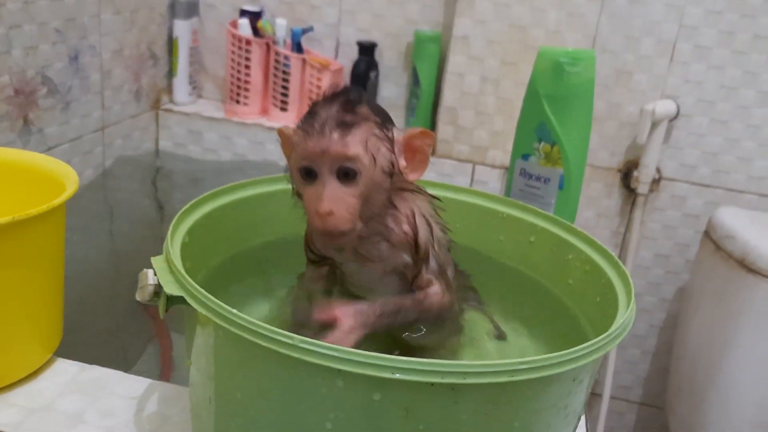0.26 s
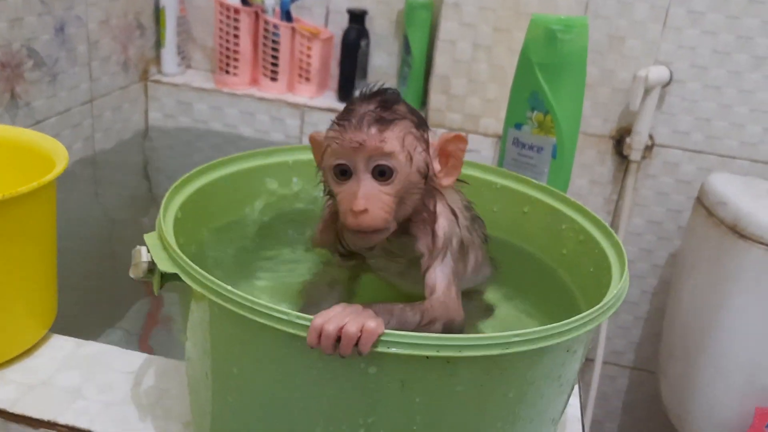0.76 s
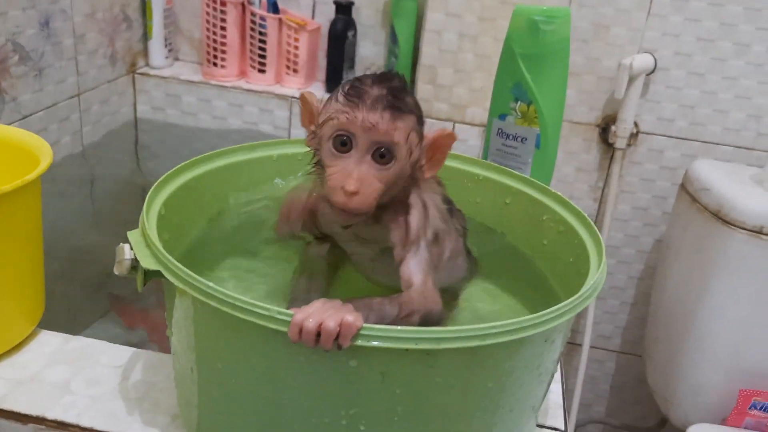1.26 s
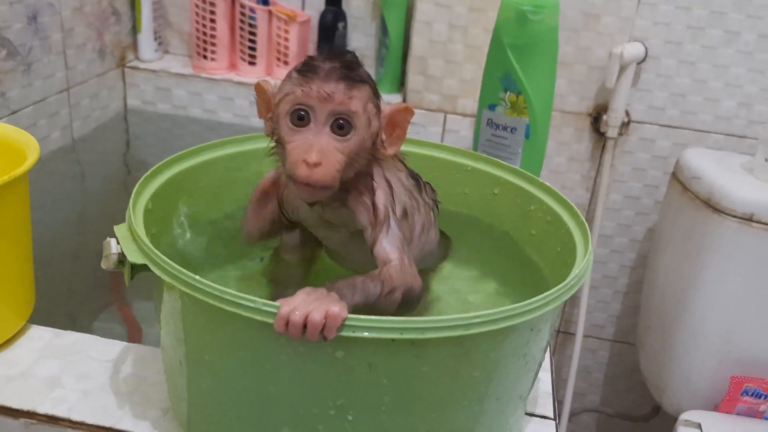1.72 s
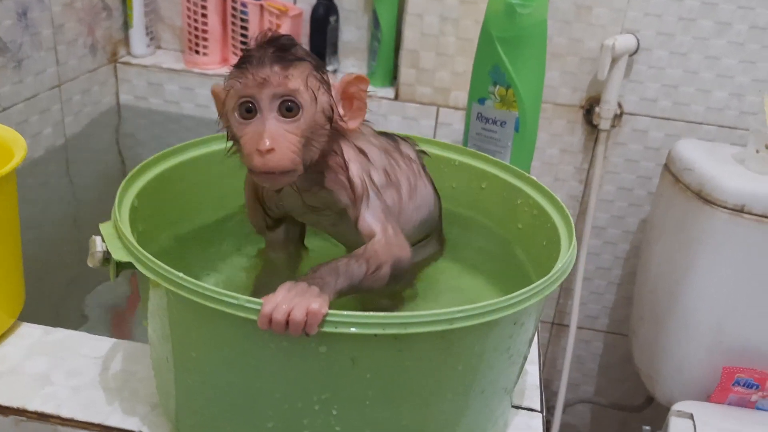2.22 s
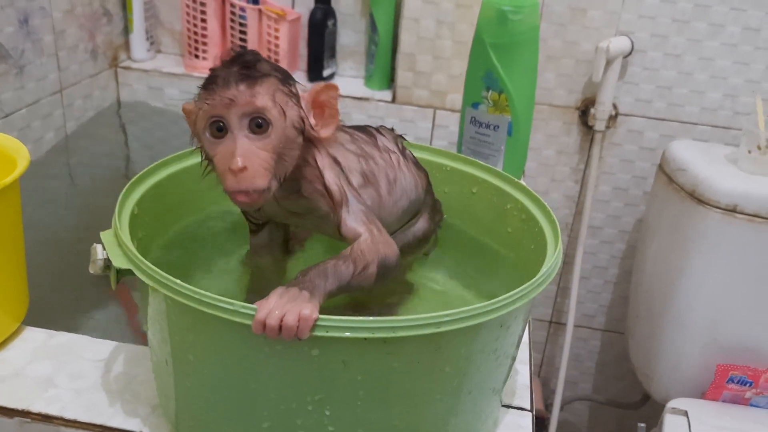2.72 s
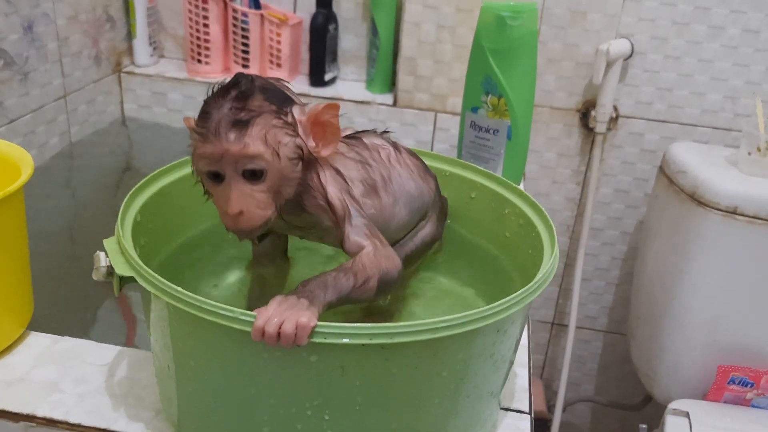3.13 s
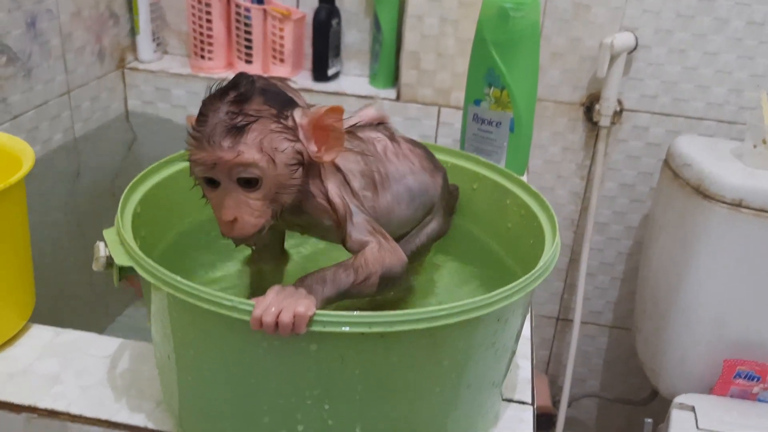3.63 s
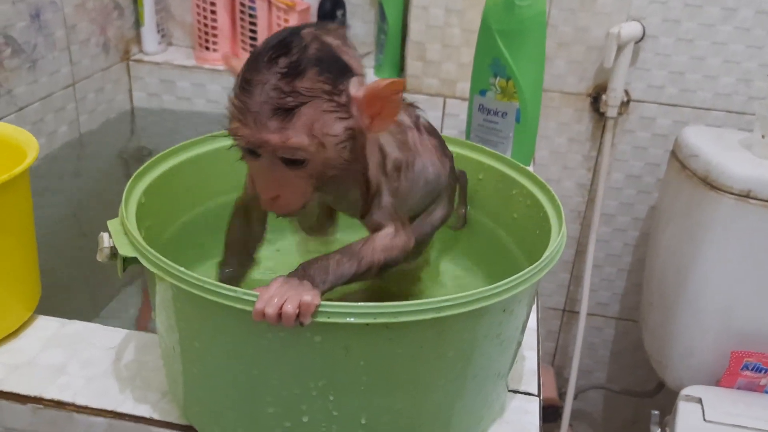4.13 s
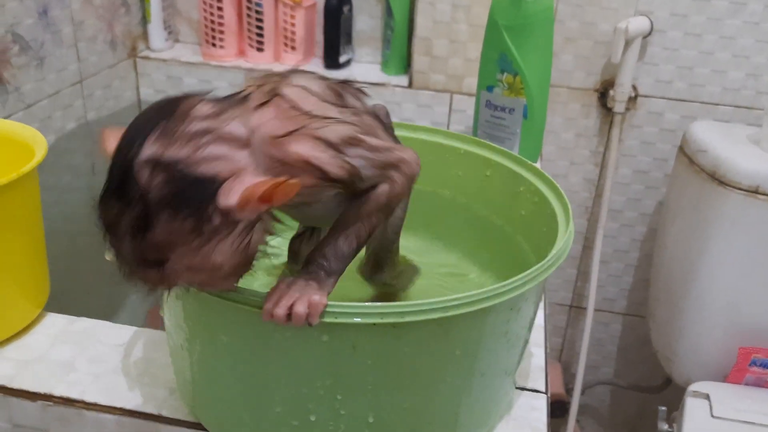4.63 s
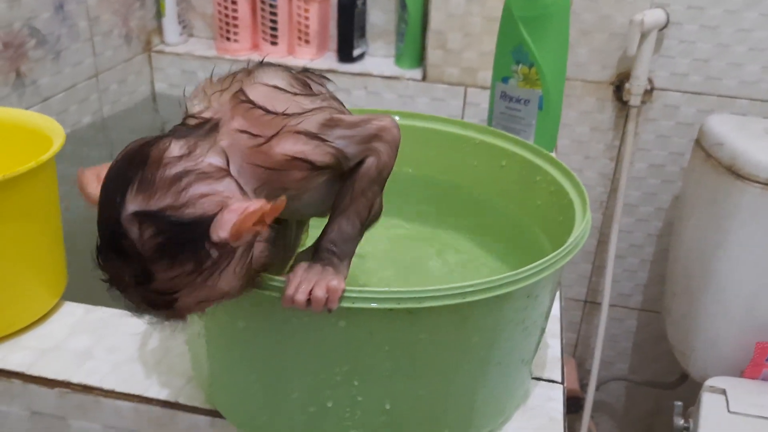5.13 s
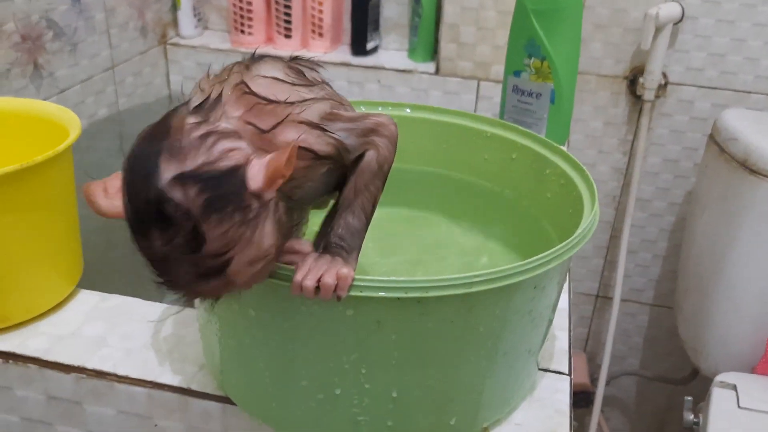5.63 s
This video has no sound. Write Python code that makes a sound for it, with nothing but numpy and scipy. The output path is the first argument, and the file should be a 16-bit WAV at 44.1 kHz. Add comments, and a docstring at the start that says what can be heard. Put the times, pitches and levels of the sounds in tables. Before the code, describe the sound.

A small wet monkey shifts about in a plastic bucket of water. The water swishes and fizzes in short, uneven strokes, strongest at the start, while drops plink and plop. The sloshing grows gentler, a wet smack knocks the plastic once, and a few very faint squeaks come before a last brief slosh. The sound is close and in stereo, with the short echo of a tiled bathroom.

```python
"""A monkey in a bucket

A small wet monkey shifts about in a plastic bucket of water in a hard, tiled bathroom.
Each move makes the water swish (noise) and fizz (tiny ringing bubbles), and the air in the bucket
hums along. Drops plop, the plastic knocks once, and a few faint squeaks (thin sliding tones)
follow as the animal climbs onto the rim."""
import sys
import numpy as np
from scipy import signal
from scipy.fft import rfft, irfft
from scipy.io import wavfile

SR = 44100
rng = np.random.default_rng(int(sys.argv[2]) if len(sys.argv) > 2 else 0)


def dump_mix(stems):
    """Bounce the given channels to the path in sys.argv[1] as a 16-bit WAV at rate SR."""
    frames = np.atleast_2d(stems).T  # one column per channel
    limited = np.clip(frames, -1, 1)  # hard clip at full scale
    pcm = np.round(limited * 32767).astype(np.int16)
    wavfile.write(sys.argv[1], SR, pcm)


N = 258420
TIME = np.arange(N) / SR
CUTOFF_HZ = 15900

# Levels are relative: the functions add their own gains. To "ring" is to fade by 60 dB.
# Strokes of a limb through the water: start_s, swell_s, hold_s, churn_db, spray_db, hollow_db
LIMB_STROKES = [ (-.05, 0.1, 0.022, -42, -37.5, -51.5), (0.058, 0.079, 0.092, -41, -36, -51),
                (0.347, 0.029, 0.059, -50, -44.5, -82), (0.56, 0.074, 0.05, -65, -51, -80),
                (0.668, .008, 0.11, -49, -46, -80), (0.702, 0.11, 0.1, -44.5, -39.5, -62),
                (0.921, 0.092, 0.12, -48, -43, -59.5), (1.182, 0.092, 0.14, -47.5, -40.5, -70),
                (1.423, 0.077, 0.082, -48.5, -45, -60.5), (1.597, 0.09, 0.092, -50.5, -48, -69),
                (1.805, 0.11, 0.027, -48.5, -45, -60), (1.929, 0.1, 0.034, -49, -47.5, -58),
                (2.114, 0.056, 0.14, -55, -51.5, -66.5), (2.55, 0.086, .05, -67.5, -58.5, -76),
                (2.684, 0.064, 0.044, -53.5, -52.5, -81), (2.852, 0.15, 0.1, -55, -52.5, -66),
                (3.07, 0.18, 0.02, -50, -49, -64), (3.317, 0.19, 0.021, -49.5, -49, -61),
                (3.675, 0.051, 0.1, -58.5, -56, -70), (3.919, 0.098, 0.19, -53.5, -51, -72),
                (4.208, 0.045, 0.11, -54.5, -54.5, -81), (4.474, 0.063, 0.19, -62.5, -54.5, -77.5),
                (4.885, 0.015, 0.17, -63, -57, -73), (5.17, .07, 0.07, -75, -58.5, -85),
                (5.427, .05, .07, -66, -66, -69.5), (5.558, 0.038, 0.011, -46, -46.5, -59),
                (5.643, 0.037, 0.014, -53.5, -75, -59.5)]
# Tone colour of churning water: pitch_hz, level_db
CHURN_COLOUR = [(100, -53), (160, -3), (225, -54), (420, -31.5), (600, 1), (800, -5), (1100, 1.5),
                (1700, 6), (2600, 6), (4000, 0), (5500, -4), (9000, -13.5)]
# Tone colour of fine spray: pitch_hz, level_db
SPRAY_COLOUR = [(1500, -24.5), (3000, -4.5), (4500, -3), (6300, -3), (9300, -5.5), (12200, -1),
                (14000, -14), (16000, -7.5)]
# Notes of the air in the bucket's hollow: pitch_hz, width_hz, level_db
HOLLOW_NOTES = [(311.6, 13, -3), (390, 46, -6.5), (493, 54, -8)]
# Drops, plops and low gulps: start_s, pitch_hz, level_db, ring_cycles, slap_vs_bubble_db
PLOPS = [ (.139, 170, -52.5, 16, -10), (0.391, 1540, -28.5, 10, -2.5), (0.625, 3000, -27, 13, -9),
         (.677, 1150, -21.5, 7, 3.5), (0.697, 1640, -27.5, 15, -7), (.8, 312, -50, 28, -10),
         (1.07, 316, -56, 41, -10), (1.109, 2760, -18.5, 60, -13), (1.185, 2320, -29.5, 38, -10),
         (1.315, 1052, -25.5, 68, -1), (1.316, 2440, -25, 36, -3), (1.945, 312.5, -49, 53, -13),
         (1.9865, 2040, -21, 12, -8.5), (1.987, 4000, -22, 28, -16), (2.041, 1247, -35, 35, -14),
         (2.044, 1730, -27.5, 15, -3), (2.682, 1220, -47, 28, -16), (2.738, 3055, -26.5, 66, -6),
         (2.766, 267, -51, 16, -4), (2.8959, 1040, -31.5, 18, -20), (3.024, 3200, -30, 55, -7),
         (3.133, 6000, -29.5, 45, -11), (3.23, 326, -54, 22, 0), (3.985, 1390, -43, 24, -2),
         (4.721, 129, -57.5, 6, -5), (4.913, 1950, -39, 15, 2), (5.834, 1463, -37.5, 10, -7)]
# How far left a plop sounds: pitch_hz, left_vs_right_db
PLOP_SIDE = [(1200, -1.5), (1900, 19), (4000, 14), (6000, -9)]
# How much of a plop goes into the room's echo: pitch_hz, gain_db
PLOP_ECHO = [(300, 9.5), (1200, 5.5), (2000, 6), (3000, -3), (4000, 2), (6000, 5)]
# Bright ticks of drops landing, most at the start of a plop, a few alone: start_s, level_db
LANDING_TICKS = [(.149, -22), (.676, -29), (1.108, -20), (2.688, -31), (2.043, -27.5), (4.191, -29),
                 (5.088, -38.5)]
# Notes of the plastic wall: pitch_hz, level_db, ring_s
WALL_NOTES = [(800, -22, .006), (1120, -16, .007), (1400, -16, .006), (1890, 3, .013), (3080, -10.5, .011),
              (3740, -15, .009), (6100, -19, .005), (6950, -17, .005)]
# Tone colour of the knock's wet smack: pitch_hz, level_db
SMACK_COLOUR = [(200, -30), (450, -12), (750, -2.5), (1200, 11), (2400, 1.5), (3400, 7.5), (4400, -3),
                (5500, 6), (7000, 7.5), (9000, -6.5), (12500, 3), (16000, -5)]
# Squeaks of wet skin and of the animal: start_s, length_s, start_hz, end_hz, level_db, wobble_share
SQUEAK_SLIDES = [ (2.301, 0.14, 7600, 7100, -60.5, 0.083), (3.624, .09, 10450, 10800, -70, .004),
                 (3.73, .14, 10150, 10700, -69.5, .005), (4.467, 0.12, 3040, 2856, -61, 0.045),
                 (4.498, 0.11, 1303, 1220, -60, 0.067), (4.686, 0.073, 1277, 1302, -55, 0.0657),
                 (5.108, 0.091, 1333, 1530, -68.5, 0.027), (5.158, 0.24, 2900, 3115, -68.5, 0.037),
                 (5.365, .13, 11400, 15500, -69, .002), (5.375, .125, 10600, 12800, -68.5, .004),
                 (5.50, .065, 15450, 14250, -66, .002), (5.495, .07, 12600, 11900, -68, .004),
                 (5.726, 0.07, 8130, 7500, -58.5, 0.046)]
# How long the tiled room rings: pitch_hz, ring_s
TILE_RING = [(200, .62), (1000, .6), (2000, .56), (6000, .62), (15000, .54)]
# Tone colour of still room air: pitch_hz, level_db
AIR_COLOUR = [(25, -42), (55, -10), (124, -1), (221, -8), (311, -4), (450, -8), (800, -7.5), (1400, -9),
              (3000, -4.5), (6000, -3.5), (9000, -8), (12300, -5), (16000, -22)]
# Low notes of the room: pitch_hz, width_hz, level_db
ROOM_NOTES = [(65.7, 52, -79), (119, 36, -75), (155, 58, -82.5)]
# How alike spread-out sound is on the left and right: pitch_hz, likeness_share
STEREO_LIKENESS = [(60, 0.85), (130, 0.6), (290, 0.95), (640, 0.3), (1300, 0), (15000, 0)]
# How far left spread-out sound leans: pitch_hz, left_vs_right_db
STEREO_BALANCE = [(60, 12.5), (200, -3.5), (380, 3), (700, 2.5), (2400, 4), (4400, -0.4), (15000, 1.5)]


def swish():
    """Moving limbs churn the water, throw spray and stir the bucket's air; returns (heard, to echo)."""
    *_, churn_db, spray_db, hollow_db = np.transpose(LIMB_STROKES)
    churn = stirring(churn_db, settle_db_per_s=80.5, rest_db=-76)
    spray = stirring(spray_db, settle_db_per_s=75, rest_db=-67)
    hollow = stirring(hollow_db, settle_db_per_s=87, rest_db=-80)
    wash = hollow * from_db(1) * hum(HOLLOW_NOTES)
    wash += churn * from_db(-1) * hiss(CHURN_COLOUR, flicker_db=2.07, flicker_hz=30)
    wash += spray * hiss(SPRAY_COLOUR, flicker_db=0.87, flicker_hz=22)
    # Churning traps larger bubbles, spray only the finest.
    large = fizz(per_s=500, spread_db=3, ring_cycles=11, low_hz=950, high_hz=4500)
    fine = fizz(per_s=900, spread_db=4, ring_cycles=32, low_hz=4630, high_hz=16300)
    bubbles = churn * from_db(-10) * large + spray * from_db(-13) * fine
    return wash + direct(bubbles, side_db=8.5, lag_s=0), from_db(2) * bubbles


def stirring(levels_db, settle_db_per_s, rest_db):
    """Loudness over time: each stroke swells, holds and settles, but the water is never quite still."""
    power = from_db(rest_db) ** 2
    for (start_s, swell_s, hold_s, *_), db in zip(LIMB_STROKES, levels_db):
        swell = np.sin(np.pi / 2 * np.clip((TIME - start_s) / swell_s, 0, 1))
        settled_s = np.maximum(TIME - start_s - swell_s - hold_s, 0)
        power = power + (swell * from_db(db - settle_db_per_s * settled_s)) ** 2
    return np.sqrt(power)


def fizz(per_s, spread_db, ring_cycles, low_hz, high_hz, pitch_count=18):
    """Tiny bubbles burst at random, each with a short ping."""
    strengths = from_db(spread_db * np.minimum(rng.exponential(1, N), 5)) * rng.choice([-1, 1], N)
    clicks = strengths * (rng.random(N) < per_s / SR)
    chosen_pitch = rng.integers(0, pitch_count, N)
    pings = 0
    for k, hz in enumerate(np.geomspace(low_hz, high_hz, pitch_count)):
        pings += np.sqrt(hz) * ring(clicks * (chosen_pitch == k), hz, ring_cycles / hz)
    return unit_level(pings)


def drops():
    """Each drop slaps the water and traps a bubble with a slightly rising note; returns (heard, to echo)."""
    heard, to_echo = 0, 0
    for start_s, hz, db, ring_cycles, slap_db in PLOPS:
        crack = tick(start_s, decay_s=0.0041, low_hz=hz / 2)
        slap = from_db(slap_db) * filtered(crack, "low", min(2 * hz, CUTOFF_HZ))  # big drops are duller
        bubble = dying_tone(start_s, hz, ring_cycles / hz, attack_s=0.00055, rise=0.042)
        plop = from_db(db) * (bubble + slap)
        heard += direct(plop, at_hz(PLOP_SIDE, hz))
        to_echo += from_db(at_hz(PLOP_ECHO, hz)) * plop
    return heard, to_echo


def landing_ticks():
    """Landing drops tick brightly, most at the start of a plop, a few alone; returns (heard, to echo)."""
    ticks = sum(from_db(db) * tick(start_s, decay_s=0.0022, low_hz=6000) for start_s, db in LANDING_TICKS)
    return direct(ticks, side_db=11), from_db(1) * ticks


def knock(start_s=4.1125, attack_s=0.0006, smack_s=0.004, spatter_s=0.018):
    """A wet smack briefly rings the plastic and flings off a spatter; returns (heard, to echo)."""
    wall = 0
    for k, (hz, db, ring_s) in enumerate(WALL_NOTES):
        wall += (-1) ** k * from_db(db) * dying_tone(start_s, hz, ring_s, attack_s)
    wall = filtered(wall, "high", 550)  # so small a contact gives off little bass
    age_s = np.maximum(TIME - start_s, 0)
    smack = from_db(-14) * np.exp(-age_s / smack_s)
    spatter = from_db(-22) * np.exp(-age_s / spatter_s)
    onset = 1 - np.exp(-age_s / attack_s)
    pitches_hz = np.maximum(np.fft.rfftfreq(N, 1 / SR), 1)
    colour = from_db(at_hz(SMACK_COLOUR, pitches_hz))
    wet_noise = unit_level(irfft(rfft(rng.standard_normal(N)) * colour, N))
    hit = from_db(-11) * (wall + (smack + spatter) * onset * wet_noise)
    return direct(hit, side_db=2.5, lag_s=0.00068), from_db(2) * hit


def squeaks():
    """Wet skin and the animal squeak in thin, wobbly, sliding tones; returns (heard, to echo)."""
    tones = 0
    for start_s, length_s, start_hz, end_hz, db, wobble in SQUEAK_SLIDES:
        progress = np.clip((TIME - start_s) / length_s, 0, 1)
        hz = (start_hz + (end_hz - start_hz) * progress) * (1 + wobble * drift(rate_hz=160))
        swell = np.sqrt(2 * np.abs(np.sin(np.pi * progress)))
        tones += from_db(db) * swell * np.sin(2 * np.pi * np.cumsum(hz) / SR)
    return direct(tones, side_db=1), from_db(-1) * tones


def bathroom_echo(sound, first_echo_s=0.00033, build_s=0.0043, near_walls_s=0.0033):
    """Close tiled walls answer at once, then a dense echo dies away, soonest in the highest treble."""
    age_s = TIME[:SR]
    tail = sum(band * fade(age_s, at_hz(TILE_RING, hz)) for hz, band in noise_bands(SR))
    tail *= 1 - np.exp(-np.maximum(age_s - first_echo_s, 0) / build_s)
    tail *= 1 + 0.075 * np.exp(-age_s / near_walls_s)
    tail /= np.sqrt(np.sum(tail ** 2) / 2)
    return signal.fftconvolve(sound[None], tail, axes=1)[:, :N]


def room_air():
    """The still room hisses faintly and hums at its low notes."""
    return from_db(-64) * hiss(AIR_COLOUR, flicker_db=2.5, flicker_hz=7.2) + hum(ROOM_NOTES)


def hum(notes):
    """Noise keeps enclosed air ringing at its own notes."""
    total = 0
    for hz, width_hz, db in notes:
        peak = signal.butter(1, [hz - width_hz / 2, hz + width_hz / 2], "band", fs=SR, output="sos")
        note = signal.sosfilt(peak, rng.standard_normal((2, N)))
        note = filtered(note, "band", [hz / 1.274, hz * 1.11])  # trim noise far from the note
        total += from_db(db) * unit_level(spread_out(note, hz))
    return total


def hiss(colour, flicker_db, flicker_hz):
    """Noise with a given tone colour, whose bands each flicker on their own."""
    total = 0
    for hz, band in noise_bands(N):
        total += band * from_db(at_hz(colour, hz) + flicker_db * drift(flicker_hz))
    return unit_level(total)


def noise_bands(length):
    """Stereo noise in slices about 0.4 octave wide; yields (centre_hz, band)."""
    edges_hz = np.geomspace(35, 17500, 24)
    white = rng.standard_normal((2, 2, length))
    for k, (low_hz, high_hz) in enumerate(zip(edges_hz, edges_hz[1:])):
        centre_hz = np.sqrt(low_hz * high_hz)
        band = filtered(white[k % 2], "band", [low_hz, high_hz])
        yield centre_hz, spread_out(band, centre_hz)


def dying_tone(start_s, hz, ring_s, attack_s, rise=0):
    """A fading tone whose pitch climbs by the share `rise` while it rings."""
    age_s = np.clip(TIME - start_s, 0, 2 * ring_s)
    tone = np.sin(2 * np.pi * hz * age_s * (1 + rise * age_s / ring_s / 2))
    onset = 1 - np.exp(-age_s / attack_s)
    return tone * onset * fade(age_s, ring_s) * (age_s < 2 * ring_s)


def tick(start_s, decay_s, low_hz):
    """The brief crack of a hit: a burst of noise, turned down below low_hz."""
    age_s = np.clip(TIME - start_s, 0, 20 * decay_s)
    burst = 0.5 * rng.standard_normal(N) * np.exp(-age_s / decay_s) * (age_s > 0)
    return filtered(burst, "high", low_hz)


def ring(clicks, hz, ring_s):
    """Each click starts a fading tone as strong as itself."""
    keep, turn = fade(1 / SR, ring_s), 2 * np.pi * hz / SR
    return signal.lfilter([0, np.sin(turn)], [1, -2 * keep * np.cos(turn), keep ** 2], clicks + 1e-18)


def drift(rate_hz, step=40, warm_up=2000):
    """A smooth random wander, about 1 in size."""
    keep = np.exp(-2 * np.pi * rate_hz * step / SR)
    noise = rng.standard_normal(N // step + warm_up + 2)
    slow = signal.lfilter([1], [1, -2 * keep, keep ** 2], noise)[warm_up:]
    return np.interp(np.arange(N) / step, np.arange(len(slow)), unit_level(slow))


def direct(sound, side_db, lag_s=0.00025):
    """The straight path from the bucket reaches the right microphone lag_s after the left."""
    return np.array([sound, np.interp(TIME - lag_s, TIME, sound)]) * pan(side_db)


def spread_out(noises, hz):
    """Two noises become sound from all around: left and right alike in the bass, not in the treble."""
    alike = np.clip(at_hz(STEREO_LIKENESS, hz), -1, 1)
    shared = np.sqrt(1 + alike) * noises[0]
    opposite = np.sqrt(1 - alike) * noises[1] * np.array([[1], [-1]])
    return (shared + opposite) * pan(at_hz(STEREO_BALANCE, hz))


def pan(db):
    """Left and right gains that make the left louder by db."""
    return from_db(np.array([[db], [-db]]) / 2) / np.sqrt(np.cosh(db * np.log(10) / 20))


def filtered(sound, kind, hz):
    """Keep the "low" part, the "high" part or a "band" of a sound."""
    return signal.sosfilt(signal.butter(2, hz, kind, fs=SR, output="sos"), sound)


def fade(age_s, ring_s):
    """A gain that falls by 60 dB in ring_s."""
    return np.exp(-np.log(1000) * age_s / ring_s)


def at_hz(table, hz):
    """Read between a table's rows, with octaves evenly spaced."""
    pitches_hz, values = np.transpose(table)
    return np.interp(np.log(hz), np.log(pitches_hz), values)


def unit_level(sound):
    """Scale to an average (rms) level of 1."""
    return sound / np.sqrt(np.mean(sound ** 2) + 1e-20)


def from_db(db):
    """Turn decibels into a gain."""
    return 10 ** (np.asarray(db) / 20)


def scene():
    """All the sources echo in the same tiled room, over its quiet air."""
    heard, to_echo = zip(swish(), drops(), landing_ticks(), knock(), squeaks())
    return sum(heard) + room_air() + bathroom_echo(sum(to_echo))


def record(dry):
    """The microphones lose the deepest bass; the highest treble is cut steeply."""
    treble_cut = signal.ellip(12, 0.1, 70, CUTOFF_HZ, fs=SR, output="sos")
    return signal.sosfilt(treble_cut, filtered(dry, "high", 38))


dry = scene()
out = record(dry)
dump_mix(out)
```